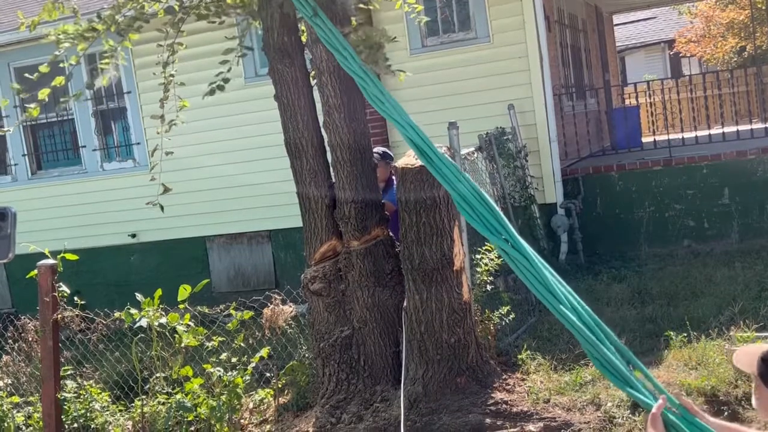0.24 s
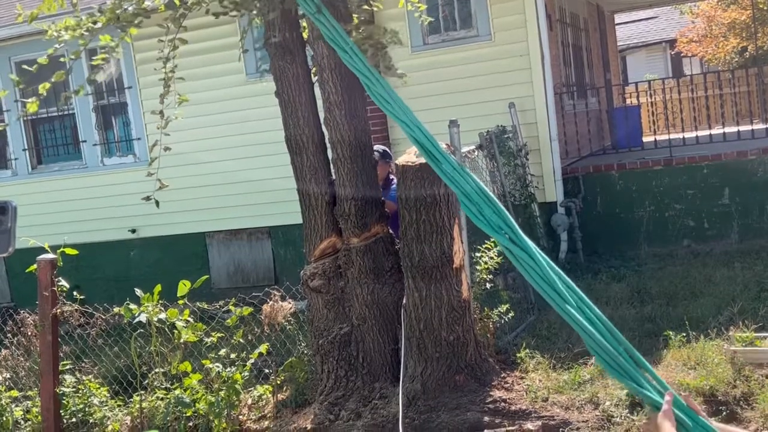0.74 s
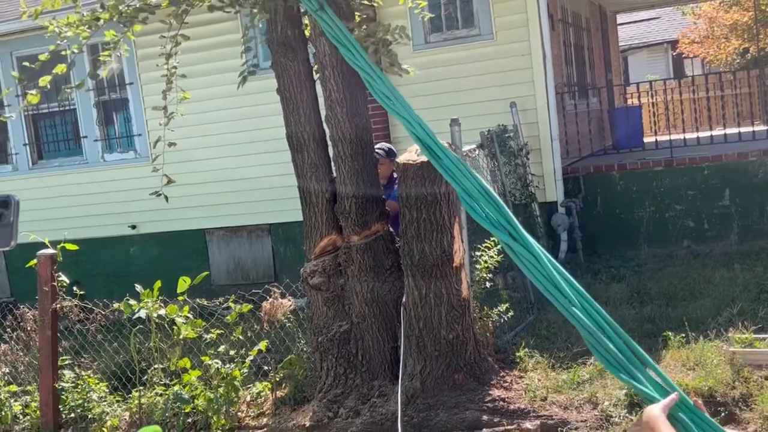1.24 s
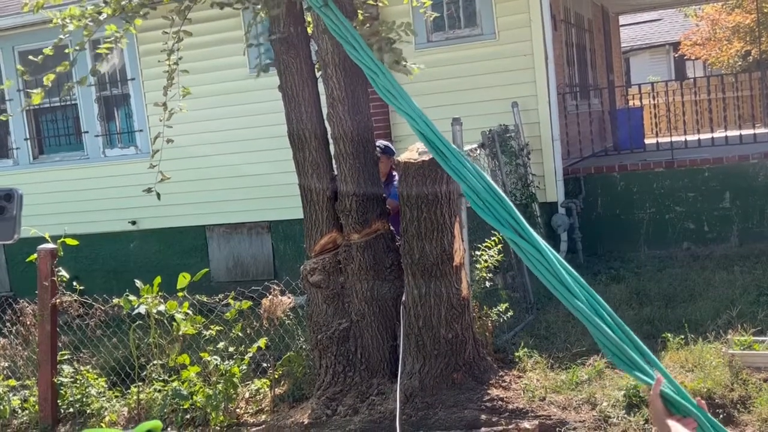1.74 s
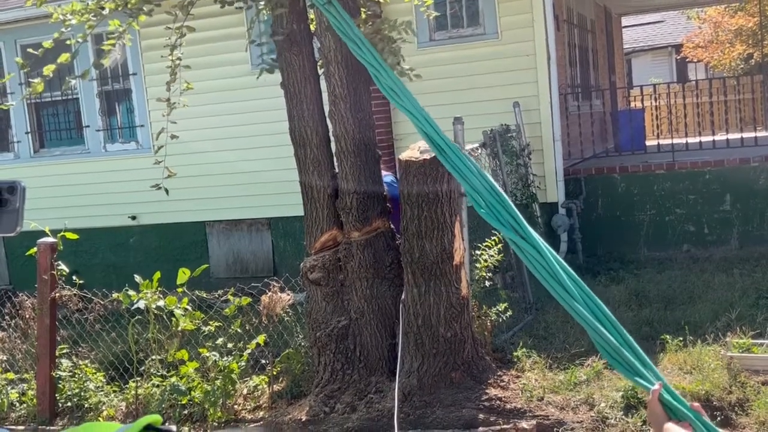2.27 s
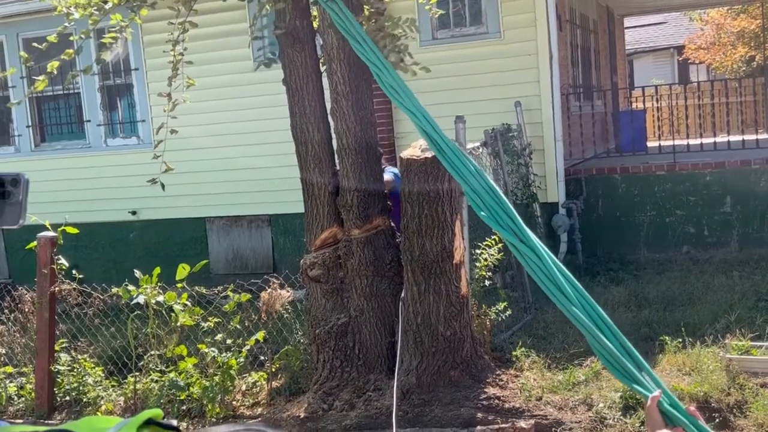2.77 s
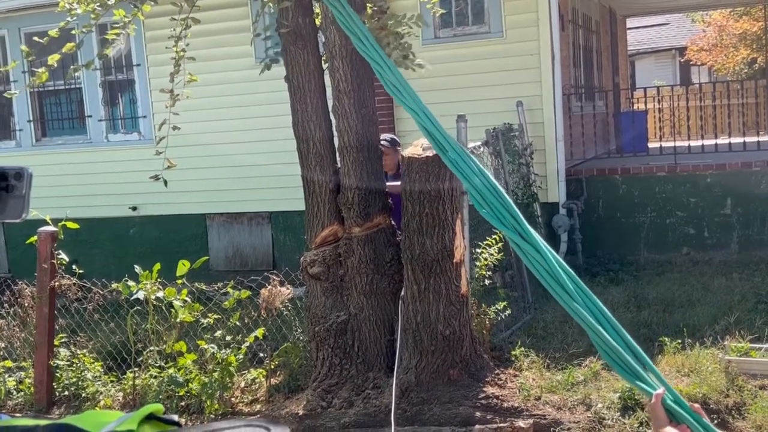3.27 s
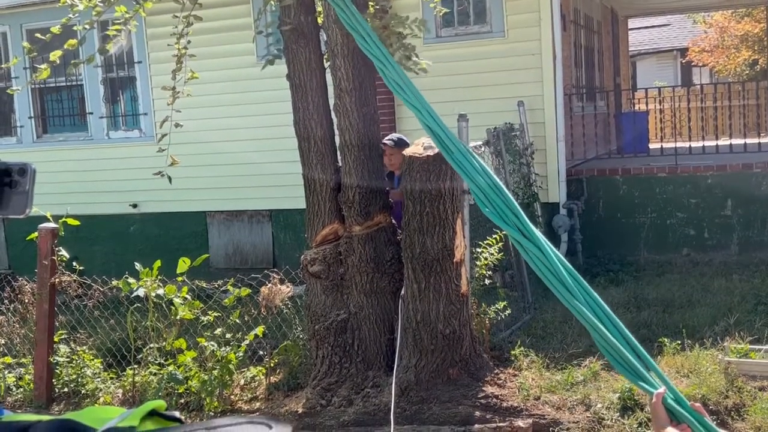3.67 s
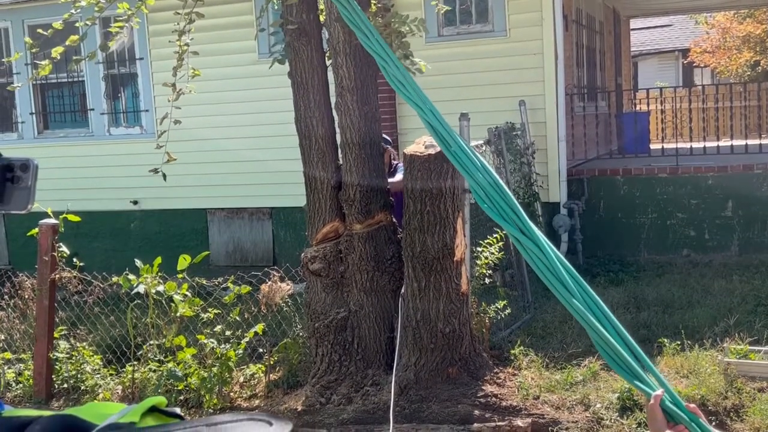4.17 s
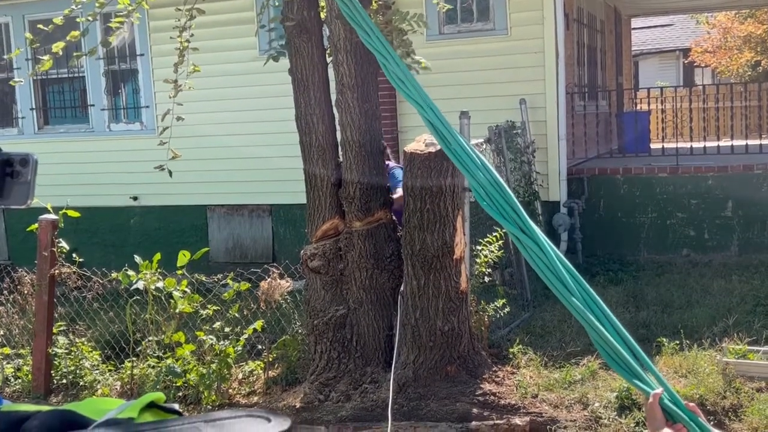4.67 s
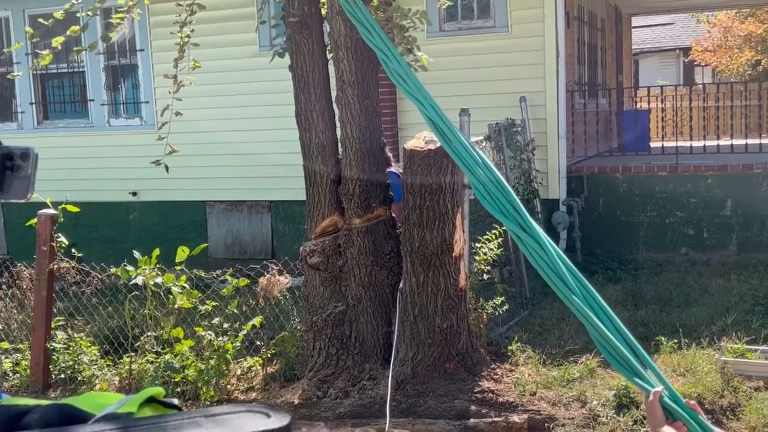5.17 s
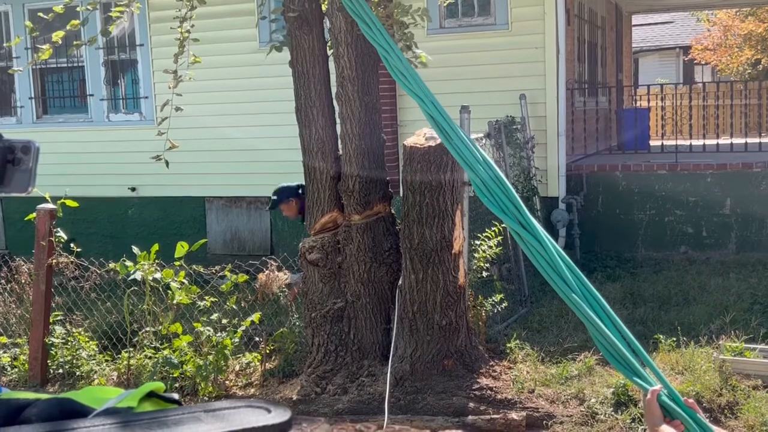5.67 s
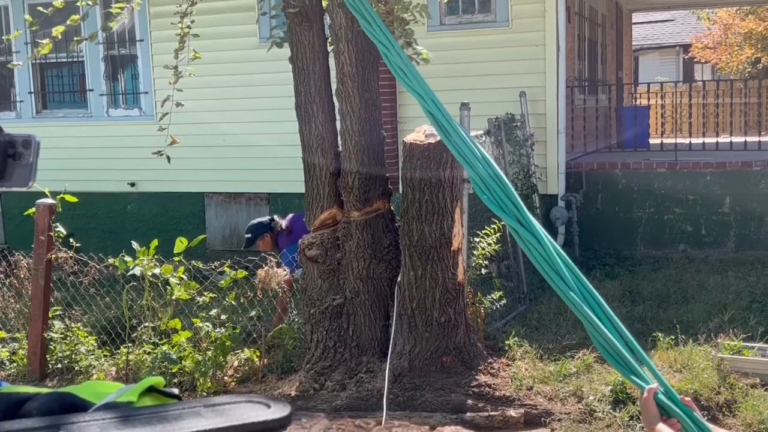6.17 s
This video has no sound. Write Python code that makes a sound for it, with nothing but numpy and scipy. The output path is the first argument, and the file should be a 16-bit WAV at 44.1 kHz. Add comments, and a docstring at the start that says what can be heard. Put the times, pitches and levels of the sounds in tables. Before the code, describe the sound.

A sharp, loud wooden crack comes at about 0.5 seconds as a hand strikes a partly cut tree trunk, and a second hard, slightly duller blow follows at 1.3 seconds. Each rings briefly, with a little splintering and a quick echo off house walls. Four much lighter knocks follow: a soft, dull thud at 2.7 seconds, a firmer one at 3.2, the clearest at 4.1 and a faint one at 4.7. Close by, a strap rustles softly through a hand in short slides, mostly between 1 and 3.5 seconds, with small scattered snaps. A distant motor hums low and steady over a faint town rumble throughout. Very faint, high insects hiss and trill in the yard, with a run of quick ticks from about 3.6 to 5.7 seconds and a few cricket chirps before the end, a little after 6 seconds.

```python
"""A half-cut tree trunk is struck by hand: two hard blows, then four lighter knocks.
The wood cracks, rings and splinters, and the house walls throw the sound back across the yard.
Close by, a strap rustles as it slides through a hand. Some way off a machine hums, katydids and
crickets sing in the plants by rubbing their wings, and the town rumbles underneath."""
import sys
import numpy as np
from scipy import signal
from scipy.fft import rfft, irfft, next_fast_len
from scipy.io import wavfile
from scipy.ndimage import uniform_filter1d

SR = 44100
rng = np.random.default_rng(int(sys.argv[2]) if len(sys.argv) > 2 else 0)


def dump_mix(stems):
    """Bounce the given channels to the path in sys.argv[1] as a 16-bit WAV at rate SR."""
    frames = np.atleast_2d(stems).T  # one column per channel
    limited = np.clip(frames, -1, 1)  # hard clip at full scale
    pcm = np.round(limited * 32767).astype(np.int16)
    wavfile.write(sys.argv[1], SR, pcm)


N = 283122
T = np.arange(N) / SR  # seconds since the scene began
AGE = T[:SR]  # seconds since one short sound began

# Each blow and how strong its parts are. A lower cutoff means a softer, duller hit.
# start_s, level_db, cutoff_hz, spot_pitch_hz, spot_db, thud_db, boom_db, ring_db, splinter_db
BLOWS = [(0.502, -2, 4870, 2440, 2, -22, -0.5, 3, -6), (1.2761, -1.5, 2605, 1394, -1.5, -3, 0, -4, -10),
         (2.7201, -32.5, 795, 260, -5, 12, 18, 5, -32), (3.2288, -24, 1700, 564, -3, 12, 8.5, 6.5, -2.5),
         (4.0693, -17, 2080, 2650, 5, 8.5, -3.5, 2.5, -10.5), (4.6848, -36, 2400, 442, -1, 12, 9, -1, 3)]
def blows():
    """A hand strikes the trunk; each blow sets the wood shaking and the yard echoing."""
    out = np.zeros((2, N))
    lean_left = gain([[1.25], [-1.25]])
    for start_s, level_db, cutoff_hz, spot_hz, spot_db, thud_db, boom_db, ring_db, splinter_db in BLOWS:
        crack = wood_crack(spot_hz, spot_db)
        thud = gain(thud_db) * trunk_thud()
        boom = gain(boom_db) * trunk_boom()
        ring = gain(ring_db) * trunk_ring()
        wood = (crack + wall_echoes(crack + thud) + ring) * lean_left + thud + boom + yard_tail(ring)
        dulled = signal.lfilter(*signal.butter(2, cutoff_hz, fs=SR), wood)
        add(out, start_s, gain(level_db) * (dulled + gain(splinter_db) * splinters()))
    return out


# Brief tones of the wood around the hit: pitch_hz, level_db, fade_s (time to fall by 60 dB)
CRACK_TONES = [(573, -16, 0.006), (857, -7.5, 0.014), (975, 1, .015), (1445, -2.5, .015),
               (2314, -6.5, 0.011), (2945, -3.5, 0.0093), (3960, -12, 0.013)]
def wood_crack(spot_hz, spot_db):
    """The wood near the hand shakes briefly, and the struck spot adds a pitch of its own."""
    spot_tone = (spot_hz, spot_db, 24 / spot_hz)  # dies away in 24 cycles
    return (tones(CRACK_TONES) + tones([spot_tone])) * build_up(0.001)


# Short, low tones across the trunk: pitch_hz, level_db, fade_s
THUD_TONES = [(329, -25, 0.12), (401.5, -21, 0.13), (480, -18, 0.062)]
def trunk_thud():
    """The trunk shakes across its width and soon settles."""
    return tones(THUD_TONES) * build_up(0.0023)


# Deep tones of the bending trunk: pitch_hz, level_db, fade_s
BOOM_TONES = [(154.5, -22, 0.24), (180, -26, 0.22), (227.6, -20.5, .2)]
def trunk_boom():
    """The heavy trunk takes a few cycles to start bending, so its boom comes in gently."""
    return tones(BOOM_TONES) * (1 - np.exp(-(AGE / 0.016) ** 3))


# Higher tones of the trunk: pitch_hz, level_db, fade_s
RING_TONES = [(593.5, -20, 0.14), (640, -25.5, 0.18), (882.7, -32.5, .28), (927, -35.5, .28),
              (988.3, -24, 0.12), (1007, -38, 0.47), (1084, -28, 0.14), (1180, -34, .2), (1414, -25, 0.13),
              (1547, -31, 0.19), (1579, -35.5, 0.177), (2342, -34, .18), (2398, -36.5, .38),
              (2405, -33.5, 0.1854), (2993, -40, 0.2), (3822, -30, 0.18), (4072, -38, .14),
              (4860, -34, .16), (7600, -35, 0.115)]
def trunk_ring():
    """The trunk keeps ringing after the crack has gone."""
    return tones(RING_TONES) * build_up(0.003)


# Tone colour of tearing wood: pitch_hz, level_db
SPLINTER_COLOUR = [(500, -24.5), (2000, -4), (3800, 5), (5200, -0.5), (7200, -0.5), (8800, -5),
                   (12500, -7.5), (16000, -23)]
def splinters():
    """Wood fibres give way in uneven little bursts."""
    dying_away = fade(0.23) + gain(-5) * fade(0.013) + gain(-21.5) * fade(1.0)
    bursts = gain(2 * wander(500)[:SR])
    return gain(-20.5) * dying_away * bursts * stereo_noise(SPLINTER_COLOUR, side_db=-13, size=SR)


# Echoes off the walls: delay_s, level_db
ECHOES = [(.0075, -23), (0.0213, -14), (0.045, -21), (.082, -25.5)]
def wall_echoes(sound):
    """Each wall sends back a later, quieter copy."""
    return sum(gain(db) * np.interp(AGE - delay_s, AGE, sound, left=0) for delay_s, db in ECHOES)


# Tone colour of sound bouncing off fence, plants and walls: pitch_hz, level_db
SCATTER_COLOUR = [(90, -30.5), (170, -13), (320, -8.5), (550, -11.5), (750, -7.5), (970, -0.5),
                  (1200, -6.5), (1480, -2.5), (1900, -11.5), (2400, -10), (2900, -12.5), (3700, -8),
                  (4800, -25.5), (9000, -24.5)]
def yard_tail(ring):
    """Near things scatter a short, lumpy tail; far houses add a faint long one and return the ring."""
    tail = (fade(0.209) + gain(-20) * fade(0.94)) * build_up(0.0029)
    lumps = gain(1.1 * wander(300)[:SR])
    scattered = gain(-18.5) * tail * lumps * stereo_noise(SCATTER_COLOUR, side_db=-2, size=SR)
    houses = fade(0.8) * rng.standard_normal((2, SR))
    return scattered + gain(-57) * signal.fftconvolve(ring[None], houses, axes=1)[:, :SR]


# Slides of the strap through the hand: fastest_at_s, level_db, slow_down_s
SLIDES = [(.25, -66.5, 0.22), (1.005, -58, 0.049), (1.099, -52, 0.052), (1.22, -58.5, 0.13),
          (1.68, -60.5, 0.11), (1.79, -55, 0.09), (1.95, -61.5, .1), (2.42, -67.5, 0.12),
          (2.54, -52.5, 0.092), (2.86, -50, .09), (2.95, -45, 0.22), (3.24, -52, 0.12), (3.37, -50, 0.12),
          (4.89, -68, 0.064)]
# Tone colour of the rubbing strap: pitch_hz, level_db
RUB_COLOUR = [(400, -34), (750, -4.5), (1400, -3), (2500, -2.5), (3500, -6), (6000, -7.5), (8500, -5),
              (12000, -7), (15500, -23)]
def strap_rustle():
    """The strap moves in tiny uneven slips, and single threads catch."""
    catches = rng.standard_normal(N) * (rng.random(N) < 150 / SR)  # about 150 a second
    threads = gain(-9.5) * normalise(resonate(catches, 5500, 0.64))
    rubbing = stereo_noise(RUB_COLOUR, side_db=-9.5) * gain(1.1 * wander(60) + 1.2 * wander(900))
    power = gain(-77) ** 2  # the strap still creeps between slides
    for fastest_at_s, level_db, slow_down_s in SLIDES:
        progress = (T - fastest_at_s) / slow_down_s
        # a slide picks up quickly, then friction brakes it
        speed = np.exp(-np.where(progress < 0, (progress / 0.58) ** 2, np.abs(progress) ** 1.2))
        power += (gain(level_db) * speed) ** 2
    return (rubbing + threads) * np.sqrt(power)


# Small snaps: start_s, level_db, pitch_hz, fade_s
SNAPS = [(0.830, -44, 2420, 0.12), (1.054, -51.5, 2430, 0.064), (1.77, -49, 2960, 0.07),
         (1.946, -50, 1970, 0.13), (2.317, -55, 4340, 0.17), (2.4894, -50.5, 3500, .08),
         (2.51, -40.5, 6660, 0.035), (2.565, -29.5, 7650, 0.0077), (2.953, -36.5, 2140, 0.054),
         (3.364, -46, 2070, .07), (3.573, -54.5, 5000, 0.073), (3.744, -58.5, 4500, 0.15),
         (4.342, -59, 3800, 0.088), (4.697, -42.5, 4640, 0.065)]
def snaps():
    """Strap and bark snap, each time with a quick puff of noise."""
    out = np.zeros((2, N))
    for start_s, level_db, pitch_hz, fade_s in SNAPS:
        loudness = gain(level_db) * build_up(0.024 * fade_s) * fade(fade_s)
        add(out, start_s, loudness * noise_band(pitch_hz, 0.96, size=SR))
    return out


# How the motor's lowest tone swells and sinks: time_s, level_db
SHAFT_SWELL = [(0.05, -41.5), (0.59, -39), (0.89, -50), (1.54, -57), (1.84, -50), (2.72, -52),
               (3.66, -48.5), (4.01, -58.5), (4.24, -43.5), (4.73, -41.5), (5.21, -51), (6.35, -47.5)]
# How its higher tones swell and sink together: time_s, level_db
OVERTONE_SWELL = [(0, -57.5), (.9, -58), (2.1, -70.5), (3.1, -57.5), (3.9, -67.5), (4.6, -61.5), (5.3, -64),
                  (6.35, -57)]
# The mix of those higher tones: times_shaft_pitch, level_db
OVERTONE_MIX = [(2, -2), (3, -2.5), (4, -5.5), (5, -9.5), (6, -19), (7, -17)]
def machine(shaft_hz=83.9):
    """A distant motor: its turning shaft hums, higher tones waver and its casing throbs."""
    phase = 2 * np.pi * np.cumsum(shaft_hz * (1 + 0.003 * wander(2.7))) / SR
    overtones = sum(gain(db + 2.7 * wander(5.7)) * np.sin(multiple * phase + rng.uniform(0, 2 * np.pi))
                    for multiple, db in OVERTONE_MIX)
    throb = 0.6 + 0.3 * np.sin(2 * np.pi * 5.5 * T + wander(0.95))
    casing = gain(-57) * throb * noise_band(165, 8.7)
    shaft = gain(2.5 + 0.6 * wander(7.3)) * np.sin(phase)
    return swell(SHAFT_SWELL) * shaft + swell(OVERTONE_SWELL) * overtones + casing


def katydid_ticks(start_s=3.6, slows_s=4.96, end_s=5.72, gap_s=0.0718, slow_gap_s=0.08, rise_s=0.012):
    """Loudness of single wing strokes: they tick evenly, then a little slower."""
    out = np.zeros((1, N))
    rise = AGE / rise_s
    stroke = rise ** 2 * np.exp(2 - 2 * rise)  # rises fast, falls slower
    tail = gain(-9) * np.minimum(rise, 1) * fade(0.58)  # lingers in the yard
    for peak_s in np.r_[np.arange(start_s, slows_s, gap_s), np.arange(slows_s, end_s, slow_gap_s)]:
        warm_up = 1 - np.exp(-(peak_s - start_s + gap_s) / 0.17)
        add(out, peak_s - rise_s, warm_up * gain(-62 + 1.1 * rng.standard_normal()) * (stroke + tail))
    return out


# The katydid's buzzes: start_s, end_s, level_db
BUZZES = [(-.3, 0.732, -64.5), (5.68, 6.074, -66)]
# Tone colour of its wings: pitch_hz, level_db
WING_COLOUR = [(7000, -37), (10500, -21), (11700, 7), (13200, 2), (14800, 1.5), (16000, -3)]
def katydid(rise_s=0.19, fall_s=0.032, stroke_hz=25):
    """Rubbing wings make a high hiss: first a buzz, later a run of ticks that closes into another."""
    ticks = katydid_ticks()
    buzz = sum(gain(db) * np.clip(np.minimum((T - start_s) / rise_s, (end_s - T) / fall_s), 0, 1)
               for start_s, end_s, db in BUZZES)
    flutter = 1 + 0.3 * np.sin(2 * np.pi * stroke_hz * T)
    hiss = stereo_noise(WING_COLOUR, side_db=-2)
    wings = hiss + 1.63 * resonate(hiss, 13750, 90) + resonate(hiss, 14480, 70)
    return wings * (ticks + buzz * flutter)


# Far, lower cricket chirps: middle_s, length_s, level_db, pitch_hz
CHIRPS = [(5.127, 0.16, -73.5, 3290), (5.283, .06, -78, 4700), (5.402, 0.15, -76.5, 3126),
          (5.616, 0.12, -73, 3290), (6.12, 0.13, -74.5, 3264), (6.272, .05, -79, 4500),
          (6.36, .05, -78, 4520)]
def crickets(trill_rate_hz=19.4):
    """Crickets rub their wings: one high pulsing trill, two slower singers and a few chirps."""
    stroke_phase = 2 * np.pi * np.cumsum(trill_rate_hz * (1 + 0.02 * wander(2))) / SR
    wings = [gain(-74.5) * noise_band(7415, 91.5) + gain(-83) * noise_band(8000, 14) for _ in range(2)]
    trill = (1 + 0.85 * np.sin(stroke_phase)) * np.array(wings)
    slow_singer = gain(-77) * np.sin(np.pi * 2.6 * T) ** 2 * noise_band(6620, 30)
    quicker_singer = gain(-67.5) * np.sin(np.pi * 4.3 * T) ** 4 * noise_band(9250, 40)
    chirps = sum(gain(db) * np.exp(-(2 * (T - middle_s) / length_s) ** 4) * noise_band(pitch_hz, 16)
                 for middle_s, length_s, db, pitch_hz in CHIRPS)
    flutter = 1 + 0.63 * np.sin(2 * np.pi * 37 * T)
    return trill + slow_singer + quicker_singer + chirps * flutter


# Tone colour of the town's background noise: pitch_hz, level_db
TOWN_COLOUR = [(20, -27.5), (31, -14), (42, -1.5), (60, 2.5), (105, -5.5), (200, -15), (400, -19.5),
               (800, -24.5), (1600, -33.5), (4300, -43), (7300, -33.5), (9000, -32), (12500, -41),
               (16000, -46.5)]
def town_rumble():
    """A low, slightly wavering rumble comes from all around."""
    return stereo_noise(TOWN_COLOUR, side_db=0) * gain(-53 + wander(6.7))


# How much left and right differ at each pitch: pitch_hz, side_db
STEREO_WIDTH = [(25, -26), (60, -15.5), (200, -6.5), (380, -6), (700, 0), (1300, -3.5), (2400, -32),
                (5000, -32.5), (7500, -17.5), (15000, 0)]
def stereo_noise(colour_rows, side_db, size=N):
    """Noise from many directions; a higher side_db makes it wider."""
    middle, side = (normalise(colour(rng.standard_normal(size), colour_rows)) for _ in range(2))
    side = gain(side_db) * colour(side, STEREO_WIDTH)
    return np.array([middle + side, middle - side])


def gain(db):
    """Turn decibels into a number to multiply by."""
    return 10 ** (np.asarray(db) / 20)


def swell(rows):
    """Loudness over time from (time_s, level_db) rows."""
    return gain(np.interp(T, *np.transpose(rows)))


def normalise(sound):
    """Scale a sound to an average power of 1."""
    return sound / np.sqrt(np.mean(sound ** 2))


def build_up(rise_s):
    """Climb from 0 towards 1, about two thirds of the way after rise_s."""
    return 1 - np.exp(-AGE / rise_s)


def fade(fade_s):
    """Die away by 60 dB in fade_s."""
    return np.exp(-np.log(1000) * AGE / fade_s)


def tones(rows):
    """Pure tones that start together and each fade at their own pace."""
    return sum(gain(db) * fade(fade_s) * np.sin(2 * np.pi * hz * AGE) for hz, db, fade_s in rows)


def colour(sound, rows):
    """Turn pitches up or down following (pitch_hz, level_db) rows."""
    hz, db = np.transpose(rows)
    size = next_fast_len(sound.shape[-1])
    all_hz = np.maximum(np.arange(size // 2 + 1) * SR / size, 1)
    gains = gain(np.interp(np.log(all_hz), np.log(hz), db))
    return irfft(rfft(sound, size) * gains, size)[..., :sound.shape[-1]]


def resonate(sound, hz, sharpness):
    """Keep the pitches near hz; more sharpness keeps a narrower range."""
    return signal.lfilter(*signal.iirpeak(hz, sharpness, fs=SR), sound)


def noise_band(hz, sharpness, size=N):
    """Noise gathered around one pitch."""
    return normalise(resonate(resonate(rng.standard_normal(size), hz, sharpness), hz, sharpness))


def wander(rate_hz):
    """A smooth random drift of about 1 either way."""
    step = int(SR / rate_hz)
    stairs = np.repeat(rng.standard_normal(N // step + 1), step)
    return normalise(uniform_filter1d(stairs, step)[:N])


def add(out, start_s, sound):
    """Mix a sound in at start_s."""
    first = int(start_s * SR)
    count = min(sound.shape[-1], N - first)
    out[:, first:first + count] += sound[..., :count]


def scene():
    """The blows on the trunk and everything else heard in the yard."""
    return blows() + strap_rustle() + snaps() + machine() + katydid() + crickets() + town_rumble()


def record(dry):
    """The microphone's openings dip the high treble; peaks are rounded and the very top is cut."""
    dipped = dry - resonate(dry, 10100, 7.3)
    left, right = dipped - resonate(dipped, 10440, 3.4)
    left = left - 2 * resonate(left, 9580, 7)  # the left opening flips the wave near this pitch
    rounded = np.tanh(0.72 * np.array([left, right])) / 0.67
    return signal.sosfilt(signal.ellip(8, 0.2, 70, 15500, fs=SR, output="sos"), rounded)


dry = scene()
out = record(dry)
dump_mix(out)
```